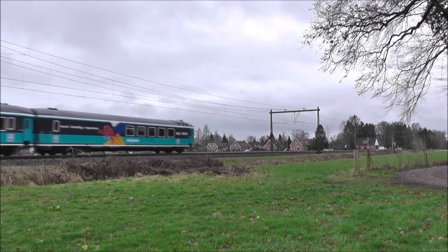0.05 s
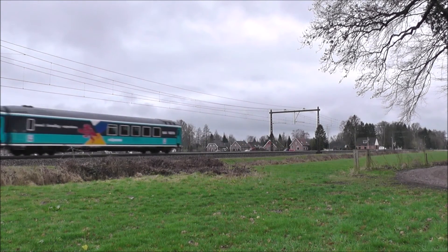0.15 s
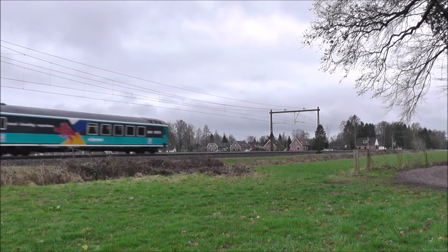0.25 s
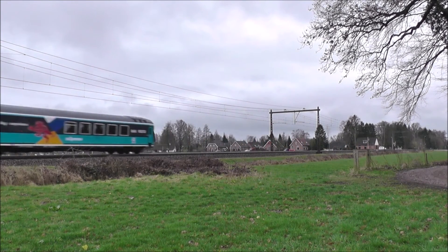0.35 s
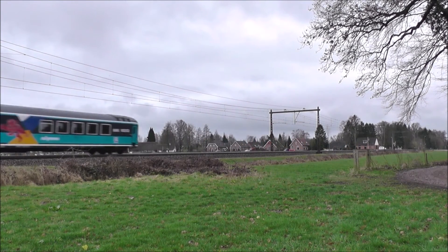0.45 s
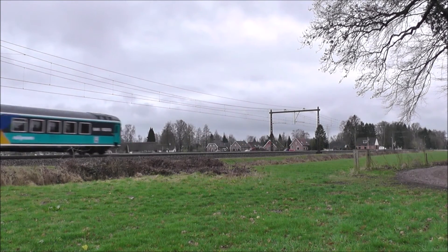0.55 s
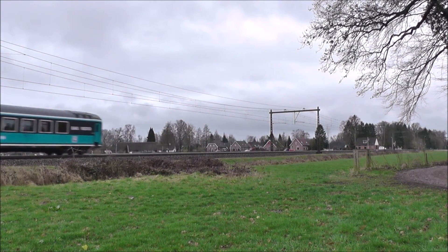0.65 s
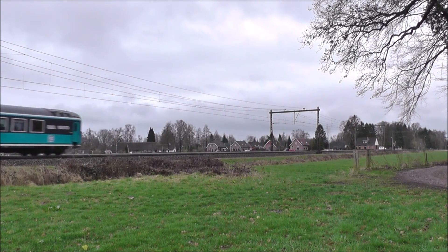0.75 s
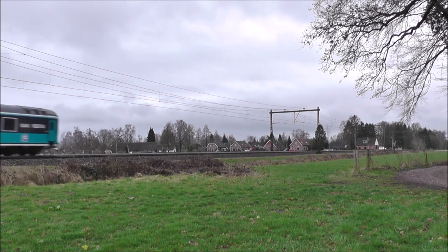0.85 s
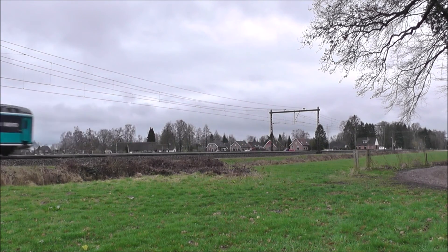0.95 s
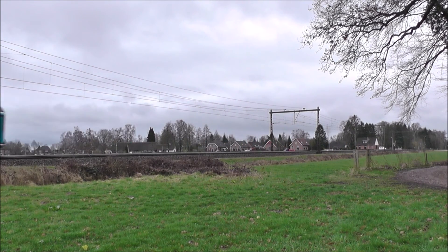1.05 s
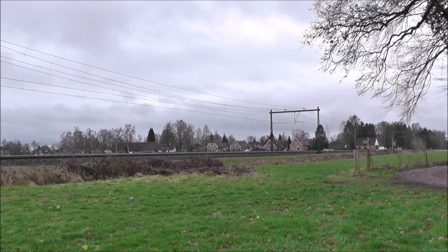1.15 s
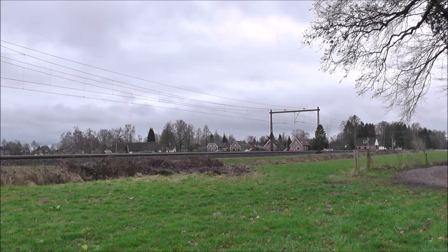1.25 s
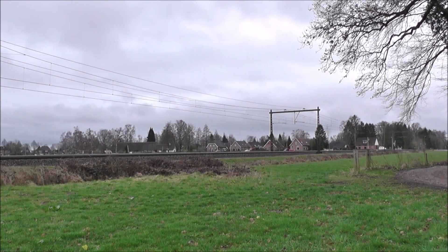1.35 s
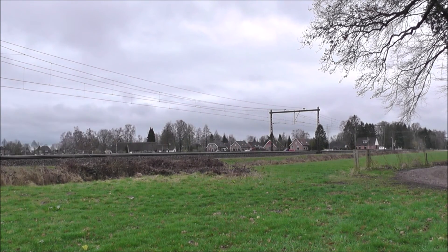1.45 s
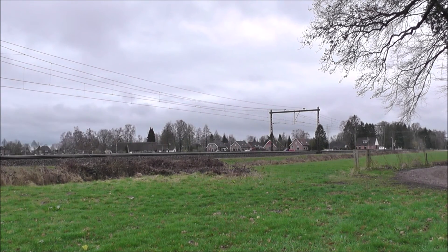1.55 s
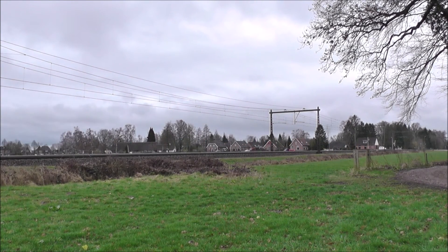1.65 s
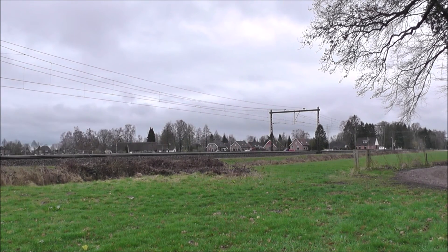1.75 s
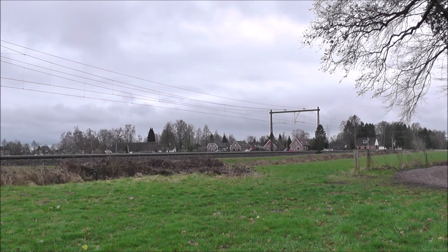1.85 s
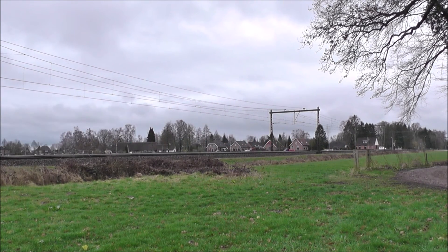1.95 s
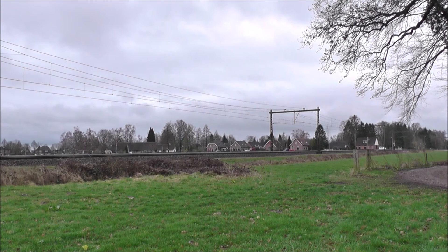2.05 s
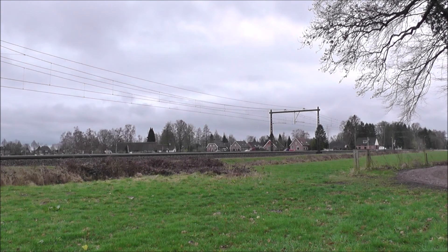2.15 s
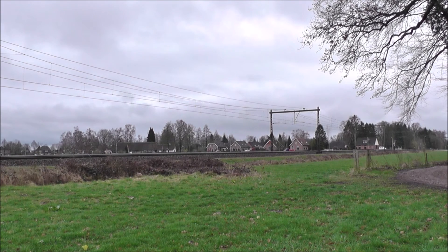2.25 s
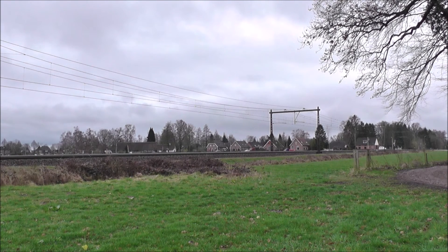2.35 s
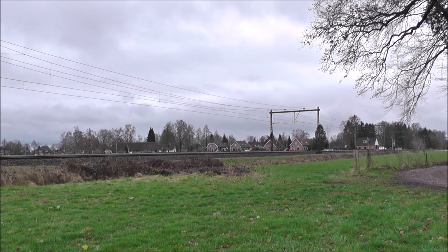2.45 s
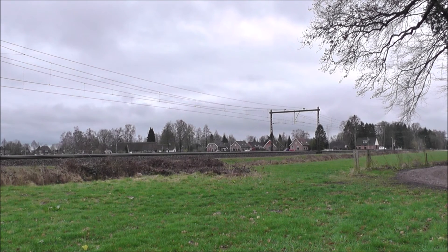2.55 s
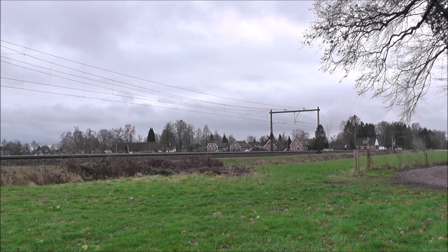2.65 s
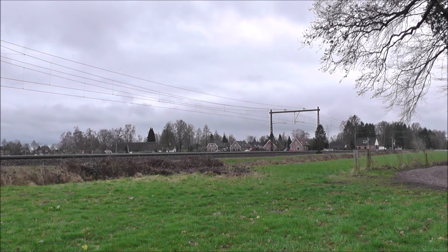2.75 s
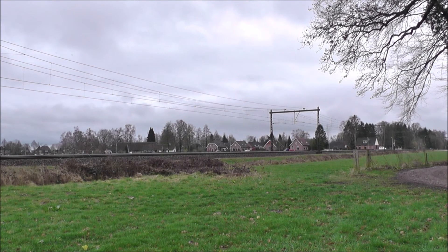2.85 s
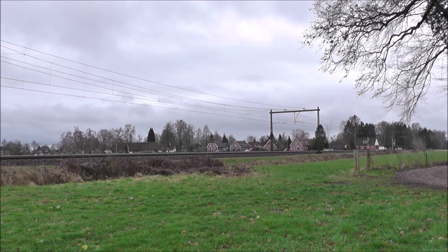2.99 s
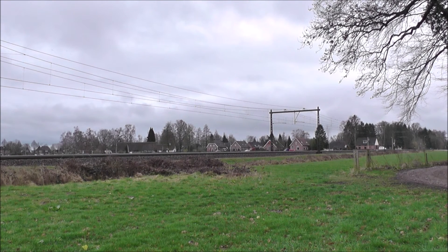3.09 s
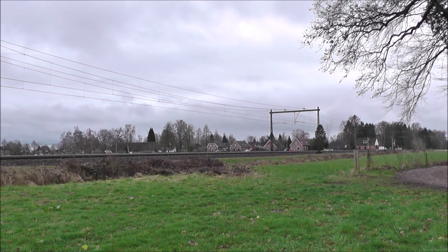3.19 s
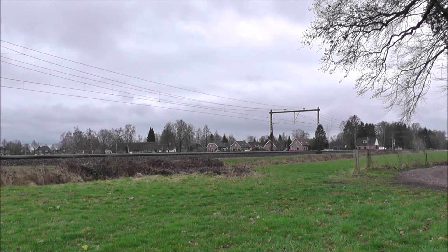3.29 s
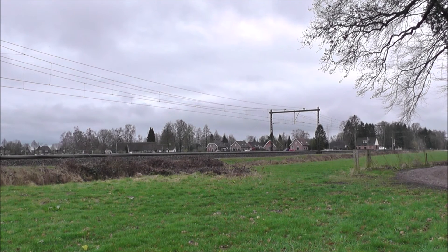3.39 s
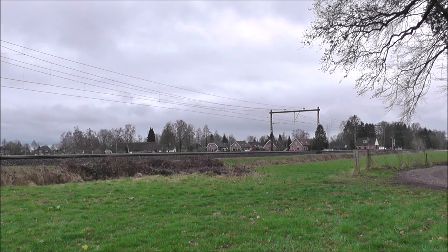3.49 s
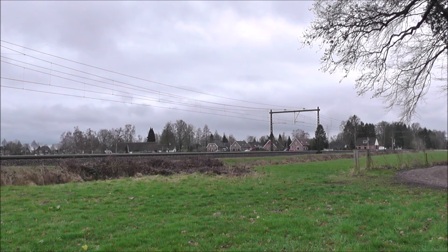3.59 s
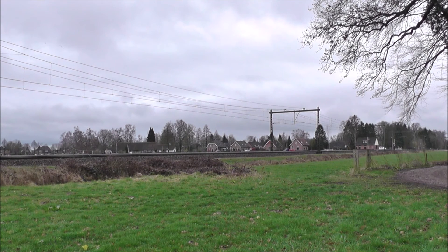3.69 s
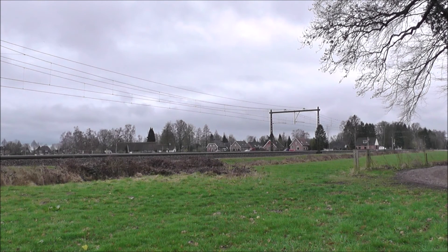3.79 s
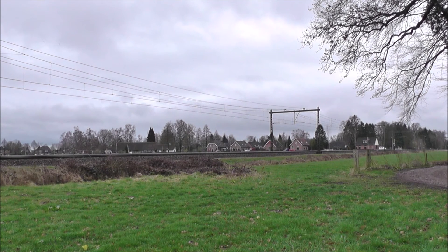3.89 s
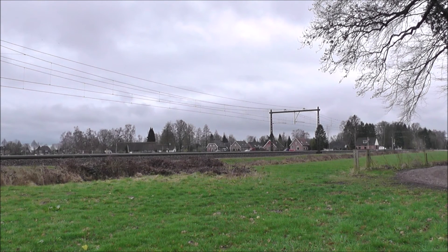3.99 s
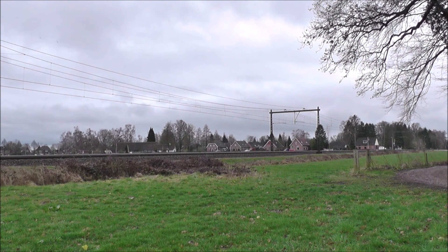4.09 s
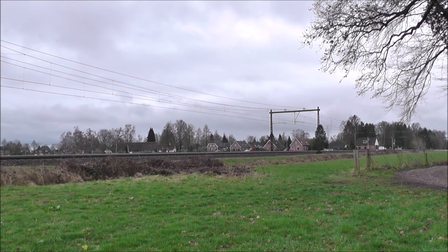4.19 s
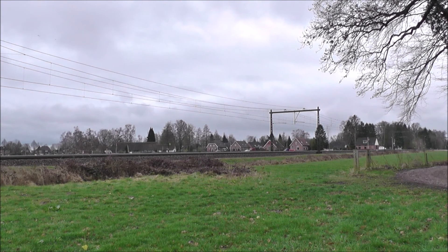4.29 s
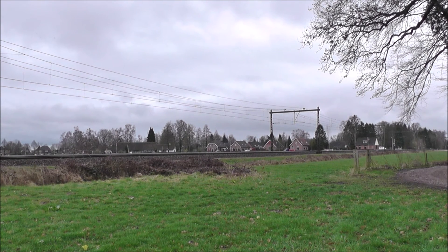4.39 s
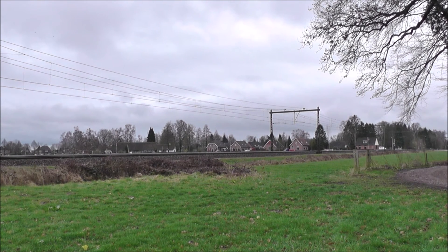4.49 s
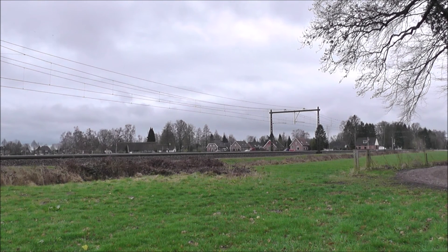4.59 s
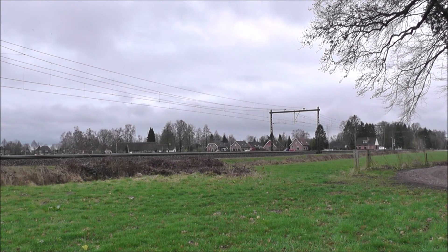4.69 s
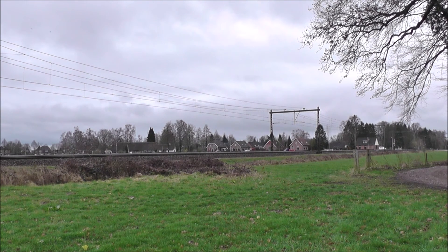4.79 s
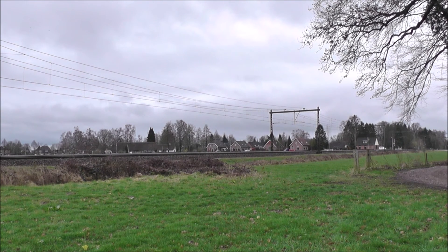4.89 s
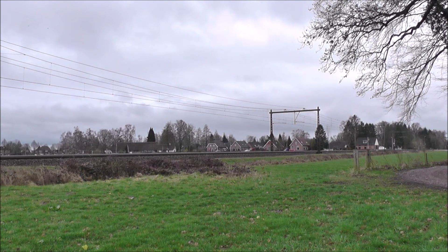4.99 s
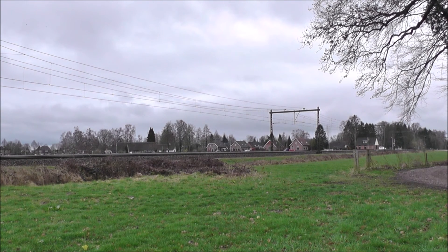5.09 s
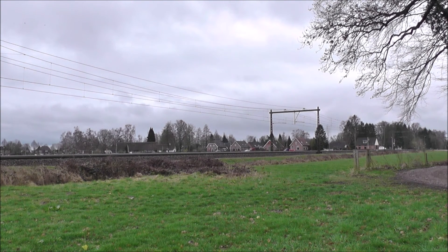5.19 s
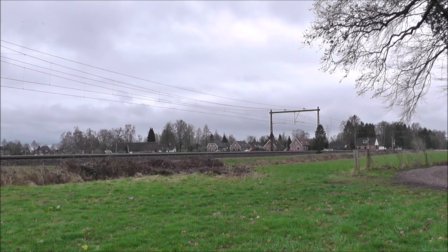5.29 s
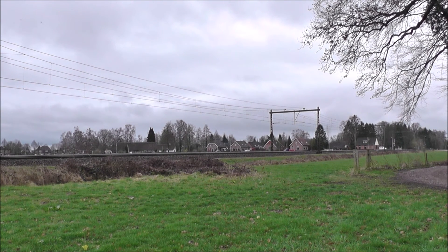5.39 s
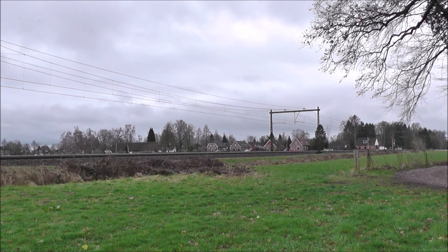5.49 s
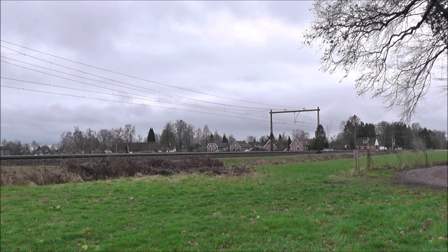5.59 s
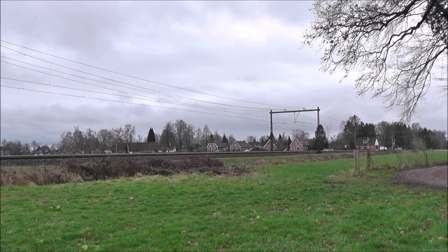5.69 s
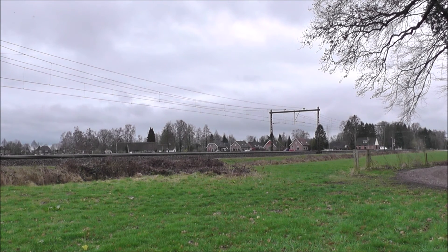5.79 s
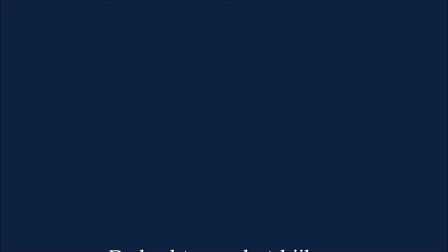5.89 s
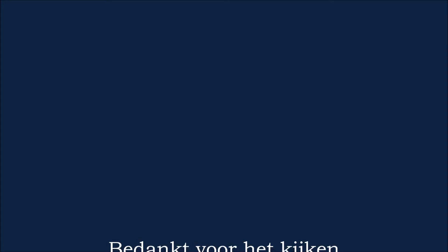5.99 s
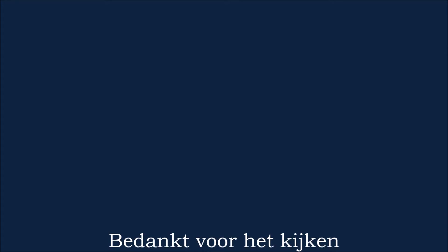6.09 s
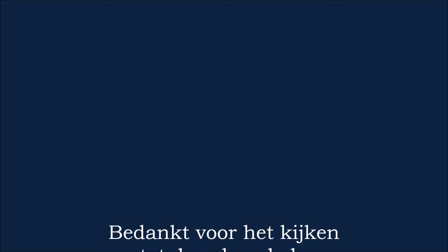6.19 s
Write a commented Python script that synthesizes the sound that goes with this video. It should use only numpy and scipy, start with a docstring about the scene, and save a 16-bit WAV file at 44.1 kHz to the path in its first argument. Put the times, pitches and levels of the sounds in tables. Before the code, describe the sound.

The sound opens at full strength with the last coaches of an electric train passing in an open field. From 0 to 1 s a broad, gritty wheel-on-rail roar surges, strongest near 0.6 s, with low droning notes and short, wavering metallic rings. Between 1 and 2.5 s the train runs off: hiss still sizzles, thin singing whines around 3 kHz swell and glide down, and a worn wheel makes soft low booms nearly ten times a second, joining into a beaded tone. From about 2.4 s the level falls faster and the treble dulls; faint whines, throbbing hums and low rumble remain until about 4 s. A light breeze stays underneath, with tiny dry ticks near 3.5 s and 4.7-5.2 s. From 4.7 s everything fades, reaching silence around 5.8 s. Outdoor stereo, brighter sounds leaning left, no obvious echo.

```python
"""Electric train rushing past

The last coaches of an electric train rush past in a field and run off to the left, then the sound fades out.
Filtered noise makes the roar of rough wheels on rails; raised or lowered bands in it slide down with Doppler.
Gliding tones make singing wheels, low drones and booms; beating tones make the hums of the running gear.
A breeze and faint ticks lie underneath, and a close pair of microphone ports hears the scene in stereo."""
import sys
import numpy as np
from scipy import signal
from scipy.fft import rfft, irfft, next_fast_len
from scipy.io import wavfile
from scipy.ndimage import uniform_filter1d

SR = 44100
rng = np.random.default_rng(int(sys.argv[2]) if len(sys.argv) > 2 else 0)


def log_audio(samples):
    """Write samples as a 16-bit WAV file to the path given in sys.argv[1]."""
    # one column per channel
    frames = np.atleast_2d(samples).T
    # limit to full scale, then quantise
    limited = np.clip(frames, -1, 1)
    pcm = np.round(limited * 32767).astype(np.int16)
    wavfile.write(sys.argv[1], SR, pcm)


N = 275164  # length in samples
SIZE, HOP = 2048, 256  # samples in one short-time spectrum, and from one to the next
HZ = np.fft.rfftfreq(SIZE, 1 / SR)
TIMES = np.arange(-(-N // HOP) + 1) * HOP / SR  # time of each frame in seconds
SECONDS = np.arange(N) / SR  # time of each sample


def from_db(db):
    """Turn decibels into gain."""
    return 10 ** (np.asarray(db) / 20)


def over_hz(table, hz):
    """Read the columns of a spectrum table on a log-frequency axis."""
    f, *columns = np.transpose(table)
    return [np.interp(np.log(hz + 1), np.log(f + 1), column) for column in columns]


def to_frames(x):
    """Turn sound into short-time spectra, frames x bins."""
    return signal.stft(x, nperseg=SIZE, noverlap=SIZE - HOP)[2].T


def to_wave(spectra):
    """Turn short-time spectra back into sound."""
    spectra = np.swapaxes(spectra, -1, -2)
    return signal.istft(spectra, nperseg=SIZE, noverlap=SIZE - HOP)[1][..., :N]


def per_sample(x):
    """Stretch a control with one value per frame to one value per sample."""
    return np.interp(SECONDS, TIMES, x[:, 0])


def wander(rate_hz):
    """Slow random movement of rms 1, up to about the given rate."""
    size = next_fast_len(N, True)
    lowpass = 1 / (1 + (np.fft.rfftfreq(size, 1 / SR) / rate_hz) ** 4)
    x = irfft(rfft(rng.standard_normal(size)) * lowpass, size)[:N]
    return x / x.std()


def bump(centre_s, length_s):
    """A smooth swell of height 1, one value per frame."""
    return np.exp(-((TIMES[:, None] - centre_s) / length_s) ** 2)


def breeze_gain(breeze_db=-69.5, corner_hz=60):
    """A breeze on the microphone: steady deep rumble, weak above its corner and below 20 Hz, by bin."""
    lowpass = 1 / (1 + (HZ / corner_hz) ** 4)
    highpass = HZ ** 2 / (HZ ** 2 + 20 ** 2)
    return from_db(breeze_db) * lowpass * highpass


def ticks(decay_s=0.0015, low_hz=6500, rustle_db=-17, rustle_s=0.037):
    """Faint dry ticks near the microphone: tiny bright snaps of noise, each inside a soft rustle."""
    # Each row: time in seconds, relative level in dB.
    tick_table = [(3.483, -32), (4.743, -41), (4.85, -47), (4.893, -41), (4.907, -41), (5.151, -39)]
    strength = np.zeros(N)
    for s, db in tick_table:
        away_s = abs(SECONDS - s)
        snap = (SECONDS >= s) * np.exp(-away_s / decay_s)
        rustle = from_db(rustle_db) * np.exp(-away_s / rustle_s)
        strength += from_db(db) * np.hypot(snap, rustle)
    noise = .5 * strength * rng.standard_normal((2, N))
    return signal.sosfilt(signal.butter(2, low_hz, "high", fs=SR, output="sos"), noise)


def turned(middle_s=1.8, scale_s=0.3):
    """The train's swing from 0 with the coaches abreast to 1 far down the line, per frame."""
    return .5 + .5 * np.tanh((TIMES[:, None] - middle_s) / (2 * scale_s))


def pitch_share(drop=0.091):
    """Doppler shift: the share of the pitch that is left as the train swings away, per frame."""
    return 1 - drop * turned()


def stages():
    """Shares of the abreast, leaving and far stages in each frame, blending from one to the next."""
    # When the abreast, leaving and far stages each hold fully, in seconds.
    stage_times = [0.29, 1.94, 3.94]
    return [np.interp(TIMES, stage_times, pick)[:, None] for pick in np.eye(len(stage_times))]


def passing_db(sag_db_per_s=0.75, gone_s=2.376, recede_db_per_s=5.5):
    """Level lost with distance: a slow sag while coaches go by, a faster fall after the last, per frame."""
    t = TIMES[:, None]
    return -sag_db_per_s * np.minimum(t, gone_s) - recede_db_per_s * np.maximum(t - gone_s, 0)


def throb(turns_per_s=9.6):
    """The throb of the turning wheels, one cycle a turn, per frame."""
    return np.sin(2 * np.pi * turns_per_s * TIMES[:, None])


def sing(hz, db, drift, flutter):
    """A tone on a pitch and a level curve; its wavering starts at a random place in drift and flutter."""
    place = rng.random()
    drift, flutter = (np.roll(x, int(place * N))[:len(hz)] for x in (drift, flutter))
    cycles = place + np.cumsum(hz * (1 + drift)) / SR
    return np.sqrt(2) * from_db(db + flutter) * np.sin(2 * np.pi * cycles)


def glides(table, drift, flutter):
    """One unbroken tone for each pair of a pitch curve and a level curve."""
    out = np.zeros(N)
    for pitch, level in table:
        at = np.flatnonzero((SECONDS >= level[0][0]) & (SECONDS <= level[-1][0]))
        hz = np.interp(SECONDS[at], *np.transpose(pitch))
        db = np.interp(SECONDS[at], *np.transpose(level))
        out[at] += sing(hz, db, drift, flutter)
    return out


def hum(near_hz, far_hz, beat_hz, *stage_db, throb_db=2.8, sink_from_s=4.1, sink_db_per_s=3):
    """Many wheels near one pitch beat against each other; the hum throbs, sinks in pitch and fades."""
    hz = per_sample(near_hz + (far_hz - near_hz) * turned())
    angle = 2 * np.pi * np.cumsum(hz) / SR
    db = passing_db() + throb_db * throb()
    db = db + sum(share * level for share, level in zip(stages(), stage_db))
    # far down the line the hums sink into the roar
    db = db - sink_db_per_s * np.maximum(TIMES[:, None] - sink_from_s, 0)
    return from_db(per_sample(db)) * (wander(beat_hz) * np.cos(angle) + wander(beat_hz) * np.sin(angle))


def hums():
    """Hums and whines of the running gear, riding on the roar as beating tones."""
    # Each row: pitch abreast in Hz, pitch far in Hz, beat rate in Hz, then the levels abreast,
    # leaving and far in dB, before the loss with distance.
    hum_table = [(268.4, 243, 7.7, -49, -45.5, -38), (476.4, 460, 20, -48, -48, -47),
                 (566, 560, 8.2, -39.5, -45.5, -45.5), (1856, 1650, 26, -35, -44.5, -43),
                 (2476, 2430, 36, -39.5, -33.5, -79), (3650, 3470, 67, -59.5, -44, -45)]
    return sum(hum(*row) for row in hum_table)


def drones(waver=.008, waver_hz=16, flutter_db=2.2):
    """Ripples worn into the wheel treads drone in low, nearly steady notes that swell and fade."""
    # Each row: a pitch curve of (time in seconds, pitch in Hz) and a level curve of (time in seconds, dB).
    drone_table = [([(0.1, 566), (0.43, 559), (0.66, 563), (0.9, 555), (1.4, 548), (2.4, 544)], [(0.1, -46),
                   (0.2, -24.5), (0.27, -39), (0.36, -34), (0.435, -23), (0.54, -39), (0.665, -26.5),
                   (0.75, -43), (0.9, -38), (1.1, -44), (1.4, -40), (2.4, -52)]), ([(0.7, 472), (2.0, 466),
                   (2.9, 462), (5.8, 460)], [(0.7, -49), (1.2, -46), (2.0, -45), (2.35, -41), (2.9, -42),
                   (3.15, -48), (3.42, -39), (3.6, -46), (4.2, -54), (4.42, -45), (4.7, -57), (5.2, -52),
                   (5.8, -58)]), ([(3.0, 130), (4.2, 127), (5.8, 126)], [(3.0, -57), (4.2, -52), (5.0, -54),
                   (5.8, -56)])]
    return glides(drone_table, waver * wander(waver_hz), flutter_db * wander(waver_hz))


def thumps(waver=0.003, waver_hz=12, flat_hz=4.5, rise_s=0.019, fall_s=0.024):
    """A worn wheel booms about once a turn; the booms share one phase and join into a beaded tone."""
    # Each row: time at its loudest in seconds, level in dB.
    boom_table = [(0.784, -32), (1.196, -37), (1.291, -26.5), (1.368, -28), (1.464, -30), (1.568, -34),
                  (1.681, -32.5), (1.784, -26.5), (1.882, -27.5), (1.993, -27.5), (2.081, -29.5),
                  (2.197, -31), (2.306, -29.5), (2.4, -31), (2.49, -32.5), (2.622, -37), (2.723, -30.5),
                  (2.828, -32), (3.093, -38), (3.228, -36.5), (3.342, -36), (3.483, -38.5), (3.74, -40),
                  (3.86, -36), (3.98, -41), (4.07, -40), (4.18, -46), (4.33, -44), (4.42, -48), (4.75, -52),
                  (4.87, -48), (5.051, -52)]
    # The pitch of the booms as the train leaves. Each row: time in seconds, pitch in Hz.
    boom_pitch = [(0.7, 286), (1.1, 271), (1.3, 268), (1.65, 262), (2.0, 258), (2.4, 254), (2.8, 253),
                  (4.0, 252), (5.2, 250)]
    out = np.zeros(N)
    hz = np.interp(SECONDS, *np.transpose(boom_pitch)) * (1 + waver * wander(waver_hz))
    cycles = rng.random() + np.cumsum(hz) / SR
    for s, db in boom_table:
        at = np.flatnonzero((SECONDS > s - 3 * rise_s) & (SECONDS < s + 3 * fall_s))
        age = SECONDS[at] - s
        swell = np.exp(-(age / np.where(age < 0, rise_s, fall_s)) ** 2)
        # each boom rings flat_hz below the pitch curve
        tone = np.sin(2 * np.pi * (cycles[at] - flat_hz * age))
        out[at] += np.sqrt(2) * from_db(db) * swell * tone
    return out


def flares(waver=.007, waver_hz=45, flutter_db=2.0):
    """A wheel or coach body flares up for a moment: one wavering tone that slides down by Doppler."""
    # Each row: time at its loudest in seconds, pitch then in Hz, level in dB, length in seconds.
    flare_table = [(0.12, 3180, -35.5, 0.082), (0.165, 1215, -30, 0.053), (0.22, 1823, -31.5, .03),
                   (0.312, 2225, -29, 0.047), (0.34, 580, -26, 0.035), (0.36, 1850, -32, 0.043),
                   (0.498, 597, -28, .035), (0.593, 1920, -30, 0.037), (0.742, 1247, -28, 0.065),
                   (0.952, 1780, -33, 0.045), (0.954, 6700, -32, 0.036), (1.21, 2840, -30, 0.052),
                   (1.56, 1840, -31, .16), (2.1, 3130, -33, 0.065), (2.199, 5160, -42, 0.048),
                   (2.24, 670, -31, .04), (2.37, 712, -34, .035), (2.38, 541, -29, 0.027),
                   (2.496, 2055, -34, 0.042), (2.717, 2760, -32, .05), (2.913, 1640, -37, 0.039),
                   (3.26, 1660, -41, .04), (3.442, 1692, -37, 0.032), (3.567, 1630, -40, 0.038),
                   (3.979, 1649, -39, 0.032), (3.991, 580, -37, 0.032), (4.43, 450, -42, 0.037),
                   (4.552, 452, -46, 0.032)]
    out, doppler = np.zeros(N), per_sample(pitch_share())
    drift, flutter = waver * wander(waver_hz), flutter_db * wander(waver_hz)
    for s, hz, db, length in flare_table:
        at = np.flatnonzero(abs(SECONDS - s) < 2 * length)
        pitch = hz * doppler[at] / np.interp(s, SECONDS, doppler)
        swell = np.exp(-2 * ((SECONDS[at] - s) / length) ** 2)
        out[at] += swell * sing(pitch, db, drift, flutter)
    return out


def rasps(waver=0.01104, waver_hz=65, flutter_db=3.6):
    """Rough rail shakes these wheel tones, so that they flicker in pitch and level within the roar."""
    # Each row: a Doppler glide of (time in seconds, pitch in Hz) and a level curve of (time in seconds, dB).
    rasp_table = [([(0, 1848), (0.4, 1820), (0.9, 1760), (1.3, 1735), (2.0, 1685), (2.9, 1645), (4.2, 1630),
                  (5.6, 1625)], [(0, -29.5), (0.25, -31.5), (0.5, -38), (0.9, -31), (1.3, -38), (2.0, -42),
                  (2.7, -45), (2.95, -41), (3.6, -40.5), (4.1, -46), (5.6, -64)]), ([(0.15, 1905),
                  (0.5, 1882), (0.8, 1850), (1.2, 1800), (1.9, 1745), (2.8, 1705), (4.2, 1685)],
                  [(0.15, -39), (0.45, -31), (0.8, -32), (1.2, -41), (1.9, -41), (2.8, -47), (3.5, -44),
                  (4.2, -53)]), ([(0, 3200), (0.5, 3130), (1.0, 3085)], [(0, -40), (0.5, -35.5),
                  (0.75, -36), (1.0, -45)]), ([(1.7, 2150), (2.3, 2108), (3.2, 2075), (4.2, 2055)],
                  [(1.7, -50), (2.3, -42), (3.1, -46), (3.6, -54), (4.2, -58)])]
    return glides(rasp_table, waver * wander(waver_hz), flutter_db * wander(waver_hz))


def whines(waver=.005, waver_hz=45, flutter_db=3.0, steadying=0.552):
    """Two singing wheels whine on as they leave, gliding down and losing a share of their wavering."""
    # Each row: a Doppler glide of (time in seconds, pitch in Hz) and a level curve of (time in seconds, dB).
    whine_table = [([(0.45, 3110), (0.88, 3035), (1.25, 3005), (1.55, 2950), (1.9, 2890), (2.3, 2820),
                   (2.8, 2755)], [(0.45, -42), (0.88, -35), (1.02, -42), (1.22, -33), (1.55, -40),
                   (1.75, -43), (1.9, -32), (2.0, -44), (2.8, -47)]), ([(1.0, 3125), (1.45, 3066),
                   (1.6, 3045), (1.9, 2987), (2.2, 2930), (2.5, 2884), (3.0, 2833), (3.3, 2816),
                   (3.75, 2800), (5.0, 2785)], [(1.0, -44), (1.45, -36), (1.6, -26), (1.73, -35),
                   (1.87, -33), (1.98, -39), (2.2, -30), (2.35, -43), (2.5, -34), (2.85, -44),
                   (3.08, -36.5), (3.3, -36.5), (3.55, -45), (3.75, -42), (4.1, -54), (5.0, -63)])]
    unrest = per_sample(1 - steadying * turned())
    return glides(whine_table, waver * unrest * wander(waver_hz), flutter_db * unrest * wander(waver_hz))


def wheels(waver=.007, waver_hz=45, flutter_db=3.0, speed_m_per_s=36, distance_m=48,
           sound_m_per_s=343, approach_db_per_s=16):
    """Each wheelset rings in several modes, swelling as it goes by and sliding down on a Doppler curve."""
    # Singing wheelsets. Each row: time abreast in seconds, level in dB, pitch factor from wear.
    wheelset_table = [(0.12, -4, 1.17), (0.5, -1, 1), (0.76, -3, 0.975), (1.52, -1.5, 0.97)]
    # Their modes, each beamed at its own angle. Each row: pitch at rest in Hz before wear, level in dB,
    # delay of the beam's peak after abreast in seconds, time to fall by 6 dB in seconds (its sign is unused).
    mode_table = [(1848, -34, 0.06, -0.2), (3660, -47.5, 0.61, 1), (6250, -46, 0.1, 0.5)]
    drift, flutter, out = waver * wander(waver_hz), flutter_db * wander(waver_hz), np.zeros(N)
    for abreast_s, wheel_db, wear in wheelset_table:
        t = SECONDS - abreast_s
        along_m = speed_m_per_s * t
        going_away = along_m / np.hypot(along_m, distance_m)  # share of the speed along the line of hearing
        doppler = 1 / (1 + speed_m_per_s / sound_m_per_s * going_away)
        approach_db = wheel_db + approach_db_per_s * np.minimum(t, 0)
        for hz, db, delay_s, length_s in mode_table:
            beam_db = -6 * ((t - delay_s) / length_s) ** 2
            at = np.flatnonzero(beam_db > -45)
            out[at] += sing(hz * wear * doppler[at], db + approach_db[at] + beam_db[at], drift, flutter)
    return out


def tones():
    """The singing wheels and hums as short-time spectra, with fresh chance at each call."""
    return to_frames(wheels() + whines() + rasps() + flares() + hums())


def thin_band_db(deepest_s=1.44, length_s=0.5, hz=390.5, width_hz=170.5, dip_db=-3.5):
    """The roar thins for a while in a low band near 390 Hz."""
    return dip_db * bump(deepest_s, length_s) * .5 ** ((2 * (HZ - hz) / width_hz) ** 2)


def rolling_db(roar_db=-53.5, dulling=0.94, rumble_hz=255, hiss_hz=3740, throb_db=0.66):
    """Level of the rolling noise by frame and bin: it fades and dulls with distance, and surges on rough rail."""
    # Each row: frequency in Hz, relative level with the coaches abreast in dB, the same from far in dB.
    roll_table = [(19.75, -11.5, -19.5), (54.9, -12, -5.5), (84.5, -5.5, 2), (190.4, -2.5, -4),
                  (325, -3.5, -3), (689, -2.5, -0.5), (1070, 1.5, 1), (1310, -0.5, -2.5),
                  (2840, -2.5, -6.5), (3150, -3, -9), (5180, -10, -20), (8260, -28, -34),
                  (11250, -30.5, -42), (13670, -49.5, -54)]
    # Wheels on rougher rail. Each row: time at the peak in seconds, length in seconds,
    # change of rumble in dB, change of hiss in dB.
    surge_table = [(0.602, 0.13, 5, 3), (1.127, 0.35, 2.5, 1.5), (1.575, 0.23, 0.5, 3),
                   (2.155, 0.18, -3.5, 2.5)]
    near_db, far_db = over_hz(roll_table, HZ)
    db = roar_db + passing_db() + near_db + dulling * turned() * (far_db - near_db)
    # bogie rumble and rail hiss each drift by -0.3 dB per second
    rumble_db = -0.6 - 0.3 * TIMES[:, None] + throb_db * throb()
    hiss_db = -2.18 - 0.3 * TIMES[:, None]
    for s, length, rumble_lift, hiss_lift in surge_table:
        rumble_db = rumble_db + rumble_lift * bump(s, length)
        hiss_db = hiss_db + hiss_lift * bump(s, length)
    db = db + rumble_db / (1 + (HZ / rumble_hz) ** 3)
    db = db + hiss_db * HZ ** 4 / (HZ ** 4 + hiss_hz ** 4)
    # the top treble, above about 9900 Hz, sizzles just behind the train
    db = db + 10.8 * bump(2.35, 0.98) * (1 - 1 / (1 + (HZ / 9900) ** 20))
    # the roar dips briefly
    return db - 2.3 * bump(0.97, 0.051) + thin_band_db()


def rolling_gain(patchy_db=0.87):
    """Strength of the rolling noise by frame and bin, with bands raised or lowered that slide down with Doppler."""
    # Bands of the roar. Each row: centre in Hz before the Doppler drop, width in Hz before it,
    # then the change of level abreast, leaving and far in dB.
    band_table = [(87.2, 24, 1.5, 0, 4), (136.7, 34, 0, 1, 5), (256.6, 71, 2.5, 4.5, 4),
                  (627, 196, 4, 1.5, 2.5), (1190, 120, 4, 1, 1), (1820, 220, 0.5, 5, 3),
                  (2269, 100, -1.5, -0.5, 6), (2310, 120, -1, -3.5, 0), (2520, 120, -1, -1.5, 2.5),
                  (2694, 120, 2, -6.5, -3), (3055, 160, 3, 3, 2), (3807, 77, -2.5, 7.5, 2),
                  (4910, 230, -1, -2.5, 4), (5550, 130, 3, 0.5, -1), (6450, 530, 5, 4.5, 3),
                  (7880, 1670, 8, 8, 3.5)]
    db, doppler = rolling_db(), pitch_share()
    for hz, width, *changes_db in band_table:
        change_db = sum(share * change for share, change in zip(stages(), changes_db))
        db = db + change_db * .5 ** ((2 * (HZ / doppler - hz) / width) ** 2)
    # wheels meet patches of rough rail: random levels, smoothed over time and then frequency
    patches = uniform_filter1d(rng.standard_normal(db.shape), size=14, axis=0)
    patches = uniform_filter1d(patches, size=16, axis=1)
    return from_db(db + patchy_db * patches / patches.std())


def contact(judder_db=0.47, judder_hz=45):
    """Two unrelated white noises that judder together as the wheels jolt over the rail."""
    judder = from_db(judder_db * wander(judder_hz))
    # the square root makes the power about 1 per Hz
    return [to_frames(judder * rng.standard_normal(N) * np.sqrt(SR / 2)) for _ in range(2)]


def ports(common, diffuse, clear):
    """The right port hears the train later and shaded; it shares part of the left sound, and all clear notes."""
    # The port pair with the train abreast, leaving and far. Each row: frequency in Hz,
    # left-right level in dB, likeness from 0 to 1, lead of the left port in radians.
    abreast_pair = [(40.0, -2.4, 0.07, 0.0), (100.0, -1.8, 0.78, 0.4), (300.0, -1.1, 0.89, 0.5),
                    (650.0, 1.8, 0.85, 0.8), (1150.0, 8.8, 0.58, 1.4), (1700.0, 8.9, 0.67, 0.0),
                    (2300.0, 7.6, 0.47, -0.6), (3000.0, 6.3, 0.73, -0.1), (4000.0, 6.6, 0.67, 0.2),
                    (5200.0, 3.8, 0.68, 0.7), (6500.0, 2.2, 0.6, 1.4), (8000.0, 1.5, 0.58, 2.5),
                    (12500.0, 3.2, 0.14, 4.5)]
    leaving_pair = [(40.0, -1.6, 0.19, 0.0), (100.0, -1.3, 0.75, 0.3), (300.0, -0.3, 0.89, 0.3),
                    (650.0, 1.3, 0.85, 0.8), (1150.0, 5.8, 0.69, 1.4), (1700.0, 10.3, 0.31, 2.3),
                    (2300.0, 5.5, 0.15, 2.7), (3000.0, 8.1, 0.55, 6.1), (4000.0, 9.5, 0.34, 7.1),
                    (5200.0, 6.9, 0.54, 7.7), (6500.0, 4.6, 0.71, 8.7), (8000.0, 2.5, 0.64, 9.2),
                    (12500.0, 2.2, 0.29, 11.0)]
    far_pair = [(40.0, -1.1, 0.36, -0.0), (100.0, -1.2, 0.9, 0.1), (300.0, -0.3, 0.72, 0.3),
                (650.0, -0.4, 0.8, 0.3), (1150.0, 2.8, 0.61, 1.1), (1700.0, 5.7, 0.55, 1.5),
                (2300.0, 2.3, 0.61, 1.8), (3000.0, 1.7, 0.42, 3.7), (4000.0, -0.3, 0.42, 4.1),
                (5200.0, -0.2, 0.42, 5.4), (6500.0, 2.6, 0.11, 7.3), (8000.0, 2.1, 0.48, 9.4),
                (12500.0, 1.6, 0.39, 11.7)]
    balance_db, same, heading = 0, 0, 0
    for table, share in zip([abreast_pair, leaving_pair, far_pair], stages()):
        side_db, likeness, lead = over_hz(table, HZ)
        balance_db = balance_db + share * side_db
        same = same + share * np.clip(likeness, 0, 1)
        heading = heading + share * likeness * np.exp(-1j * lead)
    delay = np.exp(1j * np.angle(heading))
    own = np.sqrt(np.maximum(1 - same ** 2, 0)) * diffuse  # heard at the right port alone
    right = delay * (same * common + clear) + own
    ratio = from_db(balance_db)
    left = ratio * (common + clear)
    return to_wave(np.array([left, right]) * np.sqrt(2 / (1 + ratio ** 2)))


def scene():
    """Rolling noise, breeze, hums, booms, drones and singing wheels at the two ports, plus ticks."""
    gain = np.hypot(rolling_gain(), breeze_gain())
    direct, scattered = contact()
    common, diffuse = gain * direct + tones(), gain * scattered + tones()
    clear = to_frames(thumps() + drones())
    return ports(common, diffuse, clear) + ticks()


def record(dry, fade_from_s=4.67, faded_s=5.814, fade_curve=0.58, edge_hz=13800):
    """Fade out toward silence, then remove the treble above the band edge."""
    fade = np.clip((faded_s - SECONDS) / (faded_s - fade_from_s), 0, 1) ** fade_curve
    lowpass = signal.firwin(255, edge_hz, window=("kaiser", 9), fs=SR)
    return signal.oaconvolve(dry * fade, lowpass[None], "same")


dry = scene()
out = record(dry)
log_audio(out)
```